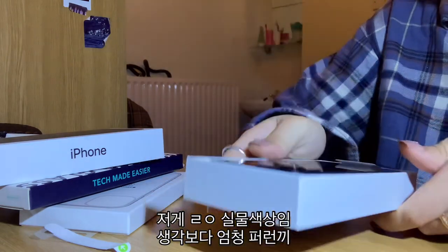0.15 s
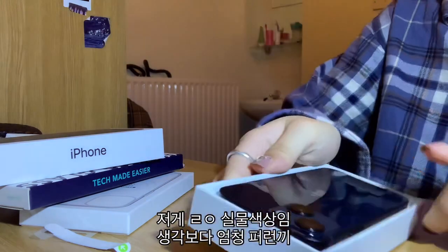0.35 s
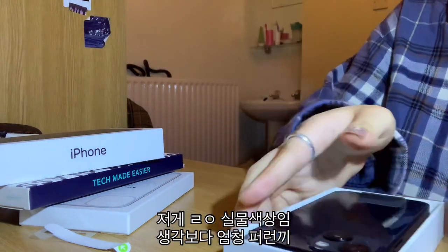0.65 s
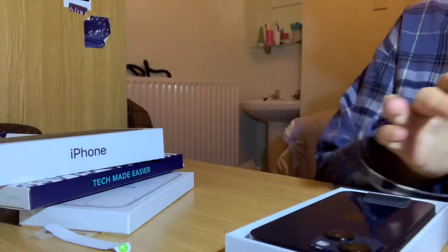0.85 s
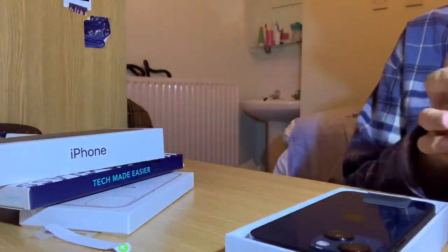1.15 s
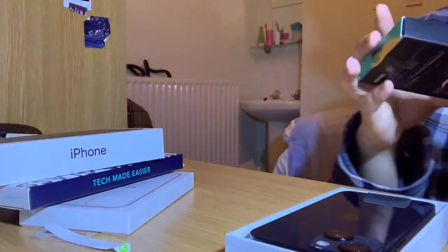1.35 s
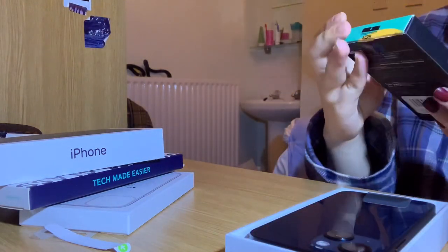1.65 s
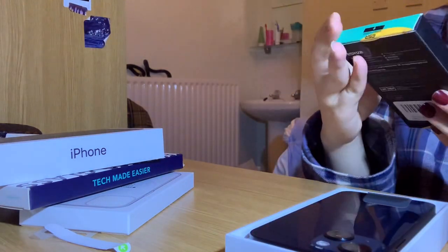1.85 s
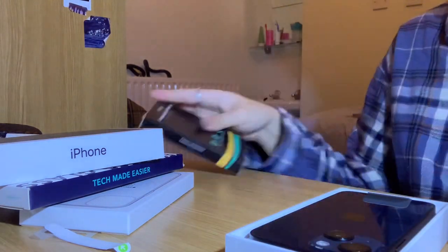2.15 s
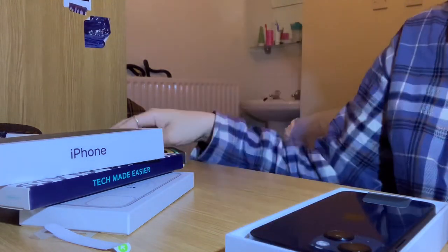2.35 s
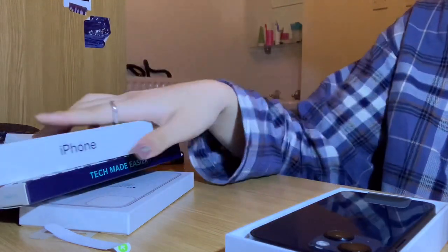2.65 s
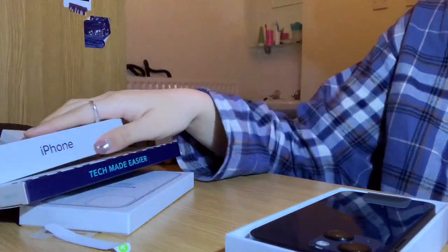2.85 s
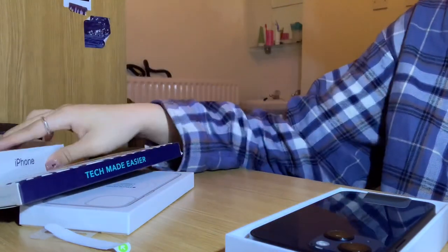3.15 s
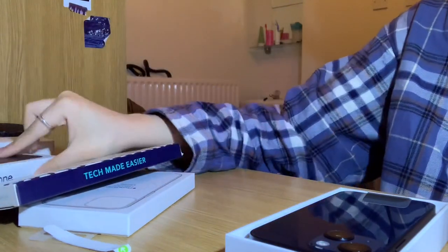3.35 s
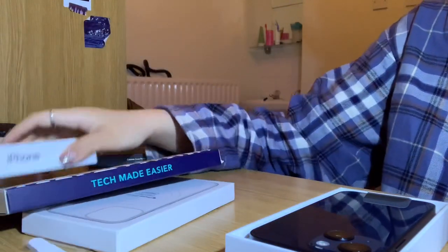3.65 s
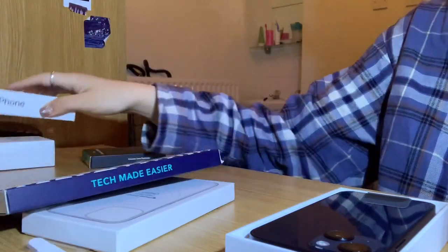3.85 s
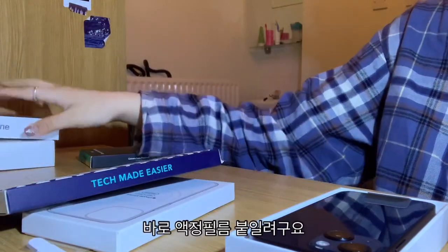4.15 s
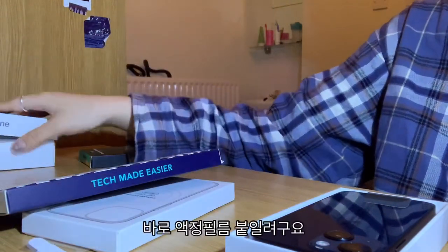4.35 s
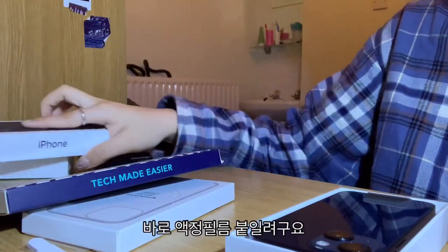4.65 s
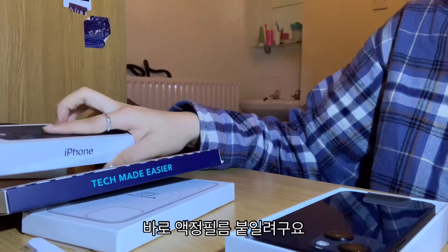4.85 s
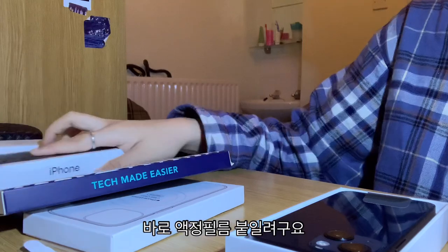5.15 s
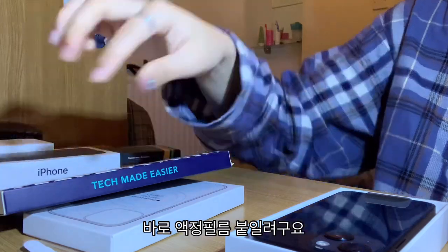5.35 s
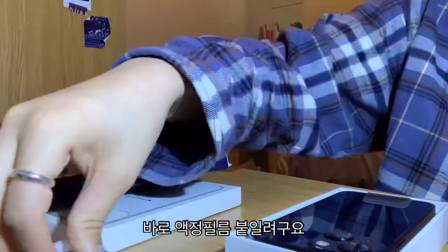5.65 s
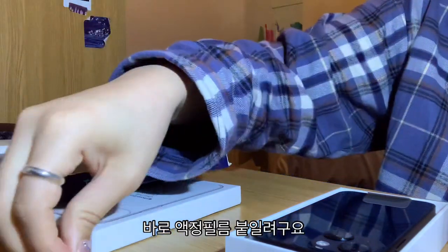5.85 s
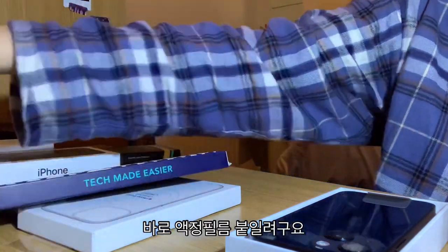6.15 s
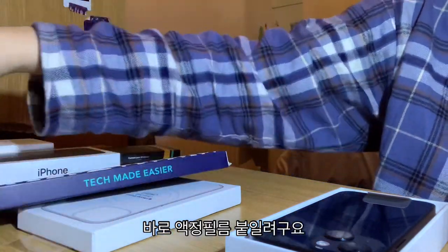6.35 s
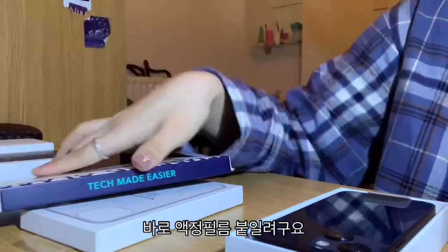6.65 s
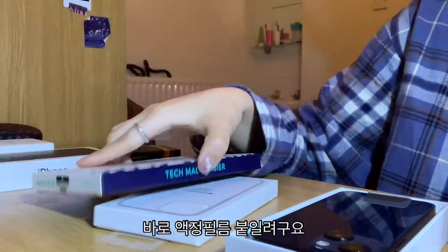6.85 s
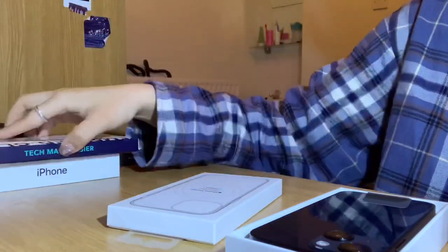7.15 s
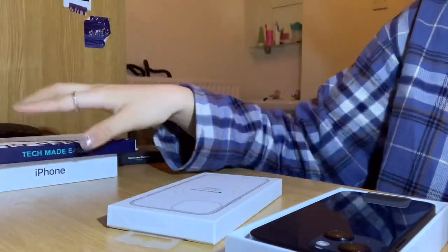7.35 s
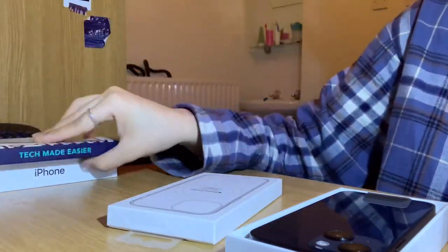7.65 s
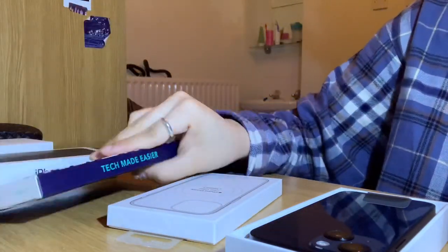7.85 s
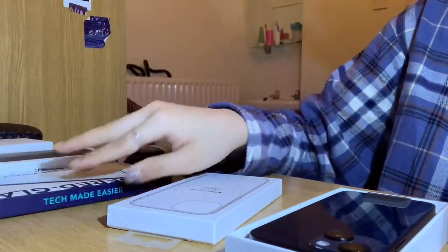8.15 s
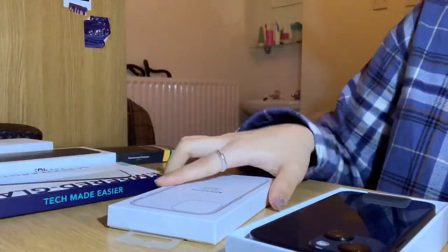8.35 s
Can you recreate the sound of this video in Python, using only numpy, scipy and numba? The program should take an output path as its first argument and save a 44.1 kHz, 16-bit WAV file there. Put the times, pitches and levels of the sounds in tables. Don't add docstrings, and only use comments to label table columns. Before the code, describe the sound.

Close stereo phone pickup of hands moving cardboard boxes: one low loud thump at the start, soft nail patter and film rustle, then clattering box walls, a rattling inner tray and dry scraping as the stack is rearranged. Two bright knocks follow at five seconds, a lull with small clicks, and final drops and taps. Faint hum and distant traffic rumble, short dry room.

```python
import sys
import numpy as np
from scipy import signal
from scipy.fft import rfft, irfft, next_fast_len
from scipy.io import wavfile
from scipy.ndimage import uniform_filter1d, map_coordinates
from numba import njit

SR = 44100
rng = np.random.default_rng(int(sys.argv[2]) if len(sys.argv) > 2 else 0)


def wav_out(sig):
    wavfile.write(sys.argv[1], SR, np.round(np.clip(np.atleast_2d(sig).T, -1, 1) * 32767).astype(np.int16))


def ratio_of_db(decibels):
    return 10 ** (np.asarray(decibels, float) / 20)


N = 375291
FAST = next_fast_len(N)
CLOCK = np.arange(N) / SR
SOFT_TICK_HZ = 2900
LIGHT_THUMP_DB, LIGHT_T60_S = -35.5, 0.011


def level(x, db):
    return x * ratio_of_db(db) / np.sqrt(np.mean(x ** 2))


def on_log_axis(hz, value):
    return np.interp(np.log(np.fft.rfftfreq(FAST, 1 / SR) + 1), np.log(hz), value)


def ring(x, hz, width):
    return signal.lfilter(*signal.iirpeak(hz, hz / width, SR), x)


def walk(rate):
    hold = int(SR / rate)
    steps = np.repeat(rng.standard_normal(N // 500), hold)[:N]
    return 1.3 * uniform_filter1d(uniform_filter1d(steps, hold), hold)


def pair(x, alike):
    alike = np.clip(alike, 0, 1)
    middle = np.sqrt(1 + alike) * x[0]
    side = np.sqrt(1 - alike) * x[1] * np.array([[1], [-1]])
    return (middle + side) / np.sqrt(2)


def both(x):
    return np.outer([1, 1], x)


def add(out, s, sound):
    i = int(s * SR)
    out[:, i:i + sound.shape[1]] += sound[:, :N - i]


def extend(rows, *same):
    return [(*row, *same) for row in rows]


def strokes(rows):
    grip_s, let_go_s, silence_db = 0.0098, 0.16, -110
    t, power = CLOCK[::32], 0
    for s, length, first_db, last_db, *_ in rows:
        corners = [s - grip_s, s, s + length, s + length + let_go_s]
        power = power + ratio_of_db(2 * np.interp(t, corners, [silence_db, first_db, last_db, silence_db]))
    return np.repeat(power, 32)[:N]


def patchy(x):
    patch_db, patch_s, patch_hz = 3.0, .022, 1200
    hz, t, cells = signal.stft(x, SR, nperseg=512)
    field = rng.standard_normal((128, 1024))
    place = np.meshgrid(hz / patch_hz, t / patch_s, indexing="ij")
    db = patch_db * map_coordinates(field, place, mode="mirror") * (hz[:, None] > 1500)
    return signal.istft(cells * ratio_of_db(db), SR, nperseg=512)[1][:, :N]


# (centre [Hz], width [Hz], level [dB])
RUB_BANDS = [
    [(550, 1300, 5), (790, 620, -4), (980, 310, 4.5)],
    [(1420, 5700, 11.5), (2500, 820, 14.5)],
    [(4220, 17000, 20.5), (5970, 4900, 10.5)],
    [(10500, 21000, 12), (14040, 2400, 16.5)],
]
# (start [s], length [s], first level [dB], last level [dB], hollow pitch [Hz])
DRAGS = [(0, 0.45, -66.5, -58, 660), (0.452, 0.082, -49, -47.5, 690), (0.666, 0.15, -43, -70, 600),
         (0.991, 0.89, -61.5, -68, 900), (1.883, 0.13, -75, -48, 1050), (2.192, .08, -41, -48, 1030),
         (2.658, 0.33, -61, -37, 650), (3.068, 0.37, -46, -60, 900), (3.307, 0.059, -38, -56, 887),
         (3.377, 0.13, -55, -39, 775), (3.604, 0.044, -36.5, -63, 680), (3.931, 0.16, -48.5, -63.5, 790),
         (4.399, 0.29, -45, -61, 918), (4.799, .07, -39.5, -77, 860), (5.086, 0.18, -45, -38.5, 750),
         (5.516, 0.16, -67.5, -38.5, 700), (6.204, 0.06, -61, -80, 670), (6.635, 0.17, -76, -46, 640),
         (6.869, .17, -62.5, -63, 630), (7.073, 0.058, -55, -43, 620), (7.406, 0.37, -56, -58.5, 600),
         (7.786, 0.353, -63, -55, 600), (8.299, .17, -63.5, -71, 600)]
# (start [s], length [s], first level [dB], last level [dB])
SCRAPES = [(0.111, 0.19, -55, -59), (0.34, 0.62, -54, -64.5), (1.03, 0.57, -65.5, -62),
           (1.858, 0.42, -59, -73), (2.167, 0.84, -48.5, -80.5), (2.91, 0.14, -40, -49.5),
           (3.042, 0.27, -37.5, -53.5), (3.48, 0.11, -41, -54.5), (4.347, 0.21, -56.5, -40),
           (4.592, 0.075, -47.5, -46.5), (5.057, .17, -50, -64.5), (5.529, 0.22, -42, -74),
           (7.397, 0.26, -49, -69), (7.79, 0.07, -44.5, -46.5), (8.357, 0.065, -53, -47)]
# (start [s], length [s], first level [dB], last level [dB])
BRUSHES = [(0.658, 0.29, -49.5, -62), (1.95, 0.06, -78, -50), (2.209, .14, -54, -39.5),
           (2.634, 0.45, -49.5, -38.5), (3.287, 0.19, -58, -39), (3.588, 0.053, -40.5, -54),
           (3.903, 0.07, -43, -46), (4.05, 0.058, -61, -49.5), (4.396, 0.1, -41, -40),
           (4.802, 0.06, -47, -61), (4.888, 0.14, -52.5, -55.5), (5.186, 0.051, -44, -47),
           (5.653, 0.1, -45, -48.5), (5.772, 0.13, -67, -53), (6.638, 0.19, -57, -42.5),
           (6.858, 0.14, -65, -49), (7.075, 0.099, -46, -51), (7.548, 0.16, -42, -49.5),
           (7.921, 0.2, -49, -48.5)]
# (start [s], length [s], first level [dB], last level [dB])
RUSTLES = [(0, 0.1, -57.5, -69), (0.122, 0.16, -56, -54.5), (0.422, 0.077, -73, -53),
           (0.776, 0.13, -55, -57.5), (1.017, 0.063, -59.5, -66), (1.12, 0.12, -62.5, -52.5),
           (1.265, 0.16, -49, -69), (1.485, 0.049, -77, -58.5), (1.626, 0.04, -54, -73),
           (1.851, 0.24, -56, -77), (2.656, 0.64, -47, -57.5), (3.309, 0.16, -52, -49.5),
           (4.453, 0.16, -49, -49), (4.6, 0.095, -57, -45.5), (4.915, 0.065, -51, -60),
           (5.071, 0.14, -50, -53), (5.723, 0.21, -68, -59.5), (6.126, 0.12, -76, -56.5),
           (6.326, 0.14, -40.5, -68.5), (6.706, 0.13, -46.5, -49.5), (7.106, 0.032, -45.5, -48),
           (7.396, 0.18, -55.5, -48), (7.646, 0.061, -56, -41.5), (7.795, 0.067, -65, -50),
           (7.929, 0.12, -49, -39.5), (8.061, 0.13, -36, -72)]


def slides():
    mix_db = [(1.5, -34.5, -31, -59.5),
              (-15.5, -5, -16, -14.5),
              (-13, -11.5, -9, -18),
              (-38.5, -27, -14, -3)]
    motions = np.array([strokes(rows) for rows in (DRAGS, SCRAPES, BRUSHES, RUSTLES)])
    surfaces = np.sqrt(ratio_of_db(2 * np.transpose(mix_db)) @ motions)
    start, length, *_, hollow_hz = np.transpose(DRAGS)
    drone_hz = np.interp(CLOCK, start + length / 2, hollow_hz)
    out, grip = 0, walk(35)
    snags = 1 + ratio_of_db(14) * (rng.random(N) < 500 / SR) * rng.random(N)
    for k, (surface, bands) in enumerate(zip(surfaces, RUB_BANDS)):
        hollow = k == 0
        grit = rng.standard_normal((2, N)) * ratio_of_db(3.5 * np.minimum(rng.exponential(size=N), 3)) * snags
        rub = 0
        for hz, width, db in bands:
            wide = ring(ring(grit, hz, width), hz, width)
            narrow = ring(wide, 0.938 * hz, width / 9) + ring(wide, 1.105 * hz, width / 7)
            off_db = -70 * np.log2(hz / drone_hz) ** 2 * hollow
            sway = ratio_of_db(db + off_db + 1.4 * walk(25))
            rub = rub + sway * (wide + ratio_of_db(1 + 2.5 * walk(12)) * narrow)
        out = out + pair(level(rub, 0), 0.31) * surface * ratio_of_db((1.2 if hollow else 2.8) * grip)
    return patchy(out)


# (frequency [Hz], density [dB per Hz])
AIR = [(30, -31.5), (50, -16.5), (80, -21), (120, -7.5), (200, -12.5), (330, -12), (450, -18), (800, -27.5),
       (1500, -30), (2200, -46), (8000, -69.5), (11000, -49.5), (16000, -60.5)]
# (centre [Hz], width [Hz], level [dB])
HUM = [
    (164.4, 2.7, -60.5),
    (264.6, 11, -60),
    (329.2, 35, -65),
    (639.7, 6.7, -64.5),
]
# (frequency [Hz], level [dB])
WHINE = [
    (635.2, -67),
]
# (time [s], level [dB])
RUMBLE = [
    (0.0, -60.5),
    (3.36, -68),
    (3.6, -64),
    (8.51, -56.5),
]


def room_tone():
    noise = rfft(rng.standard_normal((2, FAST))) * ratio_of_db(on_log_axis(*np.transpose(AIR)))
    alike = on_log_axis([150, 300, 700, 2000], [0.98, 0.94, 0.15, .05])
    air = level(irfft(pair(noise, alike), FAST)[:, :N], -54.5)
    hum = 0
    for hz, width, db in HUM:
        band = ring(rng.standard_normal((2, N)), hz, width)
        hum = hum + pair(level(band, db), 1.3 - hz / 600)
    traffic = level(ring(ring(rng.standard_normal(N), 89, 35), 89, 35), 0)
    traffic = traffic * ratio_of_db(np.interp(CLOCK, *np.transpose(RUMBLE)))
    whine = sum(ratio_of_db(db + 3.0 + 0.73 * walk(2.5)) * np.sin(2 * np.pi * hz * CLOCK) for hz, db in WHINE)
    drift = ratio_of_db(1.5 * walk(3.13))
    return whine + traffic + air * drift + hum


def modes(hz, db, t60, t, push_cycles):
    rise = 1 - np.exp(-np.outer(hz, t) / push_cycles)
    swing = np.exp(np.outer(2j * np.pi * hz - np.log(1000) / t60, t)).imag
    y = ratio_of_db(db) @ (rise * swing)
    return y / np.abs(y).max()


# (ratio to ring, level [dB], share of the ring time)
WALL_MODES = [
    (0.549, -9.5, 1.8),
    (0.752, -5.5, 0.55),
    (1, -0.5, 1.21),
    (1.298, -4.5, 0.77),
    (1.7, -10, 0.64),
    (2.201, -6.5, 0.32),
    (2.9, -15, 0.55),
    (3.8, -15, 0.57),
]
# (frequency [Hz], level [dB], t60 [s])
TABLE_MODES = [
    (117, 6.5, 0.13),
    (157.3, 6, 0.19),
    (260.6, 3.5, 0.21),
]


def knocks(rows, slap_db=-5.0):
    contact_s = 0.00089
    gripped_s, gripped_db = 0.0044, -6
    soft_card_hz, soft_card_db = 2000, -12.5
    out, t = np.zeros((2, N)), np.arange(5000) / SR
    ratio, wall_db, share = np.transpose(WALL_MODES)
    table_hz, table_db, table_t60 = np.transpose(TABLE_MODES)
    for s, db, hz, thump_db, t60 in rows:
        detune, strength, thump = rng.standard_normal((3, len(WALL_MODES)))
        mode_hz = hz * ratio * (1 + 0.1 * detune * (ratio != 1))
        soft_db = soft_card_db * np.log2(np.maximum(mode_hz / soft_card_hz, 1))
        box = modes(mode_hz, wall_db + soft_db + strength, t60 * share, t, 0.77)
        box = box * (ratio_of_db(gripped_db) + np.exp(-(t / gripped_s) ** 2))
        loose = ring(ring(rng.standard_normal(len(t)), hz, 0.5 * hz), 0.92 * hz, 2.0 * hz)
        loose = signal.lfilter(*signal.butter(2, soft_card_hz, fs=SR), loose)
        chatter = loose * np.exp(-t / (.33 * t60)) * (1 - np.exp(-t / .002))
        chatter = chatter / np.abs(chatter).max()
        table = modes(table_hz * (1 + 0.06 * detune[:3]), table_db + 6.3 * thump[:3], table_t60, t, 0.54)
        slap = ring(ring(rng.standard_normal(len(t)), 2300, 1500), 2300, 1500) * np.exp(-t / 0.0015)
        slap = ratio_of_db(slap_db) * (400 / hz) ** 2 * slap / np.abs(slap).max()
        push = ring(np.exp(-t * hz * 0.91) * np.sin(2 * np.pi * hz * t), hz, 2 * hz)
        hit = box + slap + ratio_of_db(-15.5) * push + ratio_of_db(-5.5) * chatter + ratio_of_db(thump_db + 2.0) * table
        give = 1 - np.exp(-(t / contact_s) ** 2)
        add(out, s, both(hit * give * ratio_of_db(db - 1.5)))
    return signal.lfilter(*signal.butter(2, 95, "high", fs=SR), out)


# (time [s], peak level [dB], box ring [Hz])
PATTER = [(.007, -38, 1070), (.022, -47.5, 2440), (.067, -47, 1490), (.186, -36.5, 1100), (.266, -42, 990),
          (1.022, -48, 1020), (1.453, -54, 1370), (1.489, -59, 1360), (1.544, -45, 1180),
          (1.628, -47, 1440), (1.938, -46, 1130), (1.947, -46, 1410), (2.108, -41.5, 1000),
          (2.757, -37, 2200), (2.877, -41, 2500), (3.098, -41, 1500), (3.118, -29, 1250),
          (4.064, -45, 1160), (4.102, -46, 2500), (4.97, -53, 2000), (5.642, -42, 1240), (5.674, -41, 1280),
          (6.21, -40.5, 1010), (6.266, -52, 3020), (6.914, -49, 1790), (6.936, -40, 1150), (7.56, -23, 900),
          (7.74, -36, 690), (8.003, -41, 1040), (8.31, -52, 2400)]


def nail_patter():
    return knocks(extend(PATTER, LIGHT_THUMP_DB, LIGHT_T60_S), slap_db=-18)


# (time [s], peak level [dB], box ring [Hz])
NUDGES = [(0.121, -37, 393), (0.364, -28, 496), (.458, -37.5, 360), (0.874, -39, 530), (2.192, -41, 950),
          (2.629, -36.5, 523), (2.735, -30.5, 644), (3.586, -27, 743), (3.943, -25.5, 545),
          (4.361, -35, 348), (4.403, -29.5, 610), (.747, -32.5, 1304), (4.8, -33.5, 372),
          (5.191, -33.5, 950), (6.642, -39, 925), (7.402, -27.5, 487), (7.548, -27.5, 713),
          (7.71, -33, 592), (7.947, -31.5, 870), (8.064, -37.5, 620)]


def nudges():
    return knocks(extend(NUDGES, -8, 0.092))


def ticks(rows):
    out, t = np.zeros((2, N)), np.arange(2000) / SR
    fade = ratio_of_db(-2) * np.exp(-t / 0.0011) + np.exp(-t / 0.0048) + ratio_of_db(-29.5) * np.exp(-t / 0.0095)
    for s, db, hz in rows:
        grit = rng.standard_normal((2, len(t))) * fade
        edge = ring(grit, hz, 0.49 * hz)
        edge = edge + ratio_of_db(-12.5) * ring(grit, 6000, 6400) + ratio_of_db(-34.5) * ring(grit, 12000, 7000)
        edge = pair(edge, .93)
        add(out, s, ratio_of_db(db) * edge / np.abs(edge).max())
    return out


# (time [s], peak level [dB])
EDGES = [(.1328, -38.5), (.3693, -26), (0.6477, -18.5), (.7326, -37), (.7859, -34.5), (1.969, -41),
         (2.1685, -35), (2.2864, -20.5), (2.3206, -25), (2.6554, -29), (2.759, -41.5), (3.0171, -9),
         (3.247, -56), (3.476, -39), (3.907, -32.5), (4.43, -25.5), (5.0609, -44), (5.075, -31.5),
         (5.212, -25.5), (5.5343, -28), (6.6428, -43), (7.092, -23), (7.791, -34.5), (7.8276, -28),
         (8.345, -32), (8.3877, -26)]


def card_edges():
    return ticks(extend(EDGES, SOFT_TICK_HZ))


def rubs(rows, width):
    out, size = np.zeros((2, N)), 8000
    for s, length, db, hz in rows:
        grit = rng.standard_normal((2, size)) * ratio_of_db(3 * rng.exponential(size=size))
        swell = np.sin(np.pi * np.clip(np.arange(size) / SR / length, 0, 1) ** 0.7)
        band = ring(ring(grit * swell, hz, width * hz), hz, width * hz)
        add(out, s, pair(level(band, db) * np.sqrt(length * SR / size), 0.5))
    return out


# (start [s], length [s], level [dB], pitch [Hz])
SWISHES = [(0.181, 0.18, -67.5, 5200), (0.371, 0.041, -40, 1660), (0.784, 0.031, -56, 4430),
           (0.877, 0.045, -58, 3180), (3.022, 0.024, -30, 2515), (3.294, 0.033, -66, 2000),
           (3.357, 0.21, -43, 750), (3.483, 0.055, -48, 1820), (4.447, 0.044, -40.5, 1440),
           (4.533, 0.083, -54.5, 2850), (4.536, 0.071, -55, 1160), (4.901, 0.093, -56, 5060),
           (5.093, 0.028, -41.5, 2000), (5.217, 0.05, -47.5, 1773), (7.926, 0.047, -46.5, 923),
           (0.505, 0.065, -40, 347), (0.503, 0.099, -44, 800), (3.302, 0.13, -49, 865),
           (3.428, 0.089, -37, 600), (4.799, 0.045, -42, 284), (1.203, 0.012, -36, 1150),
           (7.935, 0.034, -53, 2700), (0.651, 0.034, -40, 2150)]


def flap_swishes():
    return rubs(SWISHES, .3)


# (time [s], peak level [dB], box ring [Hz], table thump [dB], ring t60 [s])
BLOWS = [(.371, -14, 406, -6, 0.03), (.648, -1.5, 390, -12.5, 0.036), (.735, -27.5, 1225, -1.5, 0.035),
         (1.204, -23.5, 1264, -32.5, 0.0037), (2.287, -23.5, 1000, -14, 0.044),
         (2.321, -23, 648, -7.5, 0.041), (2.809, -23, 576, -11.5, 0.1), (2.954, -17.5, 429, -10, 0.078),
         (3.018, -7, 903, -18.5, 0.069), (3.136, -17.5, 1008, -19, 0.056), (3.248, -16, 1093, -20, 0.06),
         (3.295, -24.5, 840, -24, 0.026), (3.477, -9.5, 658, -21.5, 0.033), (3.906, -14, 911, -31.5, 0.047),
         (4.44, -19, 654, -13.5, 0.082), (5.075, -9, 1010, -32.5, 0.032), (5.214, -6.5, 942, -33.5, 0.028),
         (5.219, -13, 542, -21.5, 0.073), (5.537, -21.5, 430, -25, 0.062), (7.092, -20, 520, -12, 0.043),
         (7.117, -20, 644, -21.5, 0.051), (7.624, -20, 637, -41, .035), (7.796, -29.5, 432, -23, 0.14),
         (8.075, -21, 513, -6, 0.068)]


def boxes_set_down():
    return knocks(BLOWS)


# (time [s], peak level [dB], box ring [Hz], table thump [dB], ring t60 [s])
BOUNCES = [(.384, -31.5, 320, 2.5, 0.082), (.641, -22.5, 496, -20, 0.023), (.659, -17.5, 295, -2.5, 0.14),
           (3.253, -13, 525, -17, 0.11), (3.309, -25.5, 945, -19.5, 0.044),
           (3.485, -20.5, 574, -12.5, 0.045), (4.439, -21, 1100, -19, 0.025),
           (4.455, -27, 1364, -22.5, 0.036), (5.063, -29, 670, -23, .04), (5.083, -19.5, 607, -30, .03),
           (5.099, -27, 600, -18, .04), (5.127, -30.5, 587, -24, 0.022), (5.231, -28, 1035, -8, 0.022),
           (7.409, -28, 550, -10, .03), (7.799, -19, 468, -24, 0.033), (8.09, -31.5, 400, -15.5, 0.064)]


def bounces():
    return knocks(BOUNCES, slap_db=-18)


# (time [s], peak level [dB], box ring [Hz])
TAPS = [(2.172, -36, 1200), (.562, -37, 373), (0.823, -35, 1090), (0.893, -34, 1160), (1.865, -42.5, 2310),
        (1.967, -34, 980), (2.011, -32, 486), (2.14, -34.5, 970), (2.657, -24, 850), (2.696, -26, 482),
        (2.913, -28, 680), (2.079, -42.5, 980), (6.711, -44, 1510), (6.772, -46, 507), (6.969, -40, 703),
        (7.064, -30.5, 880), (7.452, -39, 350), (7.477, -34, 955), (7.597, -33, 473), (7.825, -22.5, 546),
        (8.343, -29.5, 704), (8.359, -25, 694), (8.385, -30.5, 726)]


def finger_taps():
    return knocks(extend(TAPS, -31.5, 0.044))


# (start [s], length [s], level [dB], pitch [Hz])
RASPS = [
    (2.17, 0.085, -55, 2700),
    (6.706, 0.043, -45.5, 2900),
    (.876, 0.032, -48, 5600),
    (.744, 0.011, -49, 5800),
    (8.385, 0.028, -45, 3800),
]


def fibre_rasps():
    return rubs(RASPS, 1.26)


# (time [s], peak level [dB], ring [Hz])
NAILS = [(.822, -23, 10500), (.8755, -27.5, 4900), (1.202, -31.5, 9200), (2.007, -36.5, 5270),
         (2.81, -20, 4470), (2.946, -18.5, 2200), (3.091, -24, 10000), (3.166, -41.5, 12600),
         (3.5865, -26.5, 6060), (4.799, -38.5, 4690), (5.677, -27.5, 13260), (5.6926, -22, 15200),
         (5.702, -22, 3700), (5.8725, -38, 12600), (6.21, -33, 10030), (6.3273, -20.5, 10500),
         (6.7092, -38, 4730), (7.0606, -34, 5870), (7.127, -33.5, 11100), (7.3986, -38.5, 5130),
         (7.5485, -35, 4800), (7.624, -22.5, 5500), (7.95, -36.5, 9600)]


def nail_clicks():
    return ticks(NAILS)


def rattles(rows, t60):
    out, t = np.zeros((2, N)), np.arange(1500) / SR
    for s, db, ring_hz in rows:
        hz = ring_hz * np.array([.93, 1.08]) * (1 + 0.049 * rng.standard_normal(2))
        add(out, s, both(ratio_of_db(db) * modes(hz, np.zeros(2), np.full(2, t60), t, 3.3)))
    return out


# (time [s], peak level [dB], pitch [Hz])
POCKS = [
    (1.2035, -31.5, 1152),
    (2.0065, -32.5, 1140),
    (3.295, -16.5, 814),
    (7.793, -26.5, 517),
    (8.074, -17.5, 530),
]


def lid_pocks():
    return rattles(POCKS, 0.034)


# (start [s], length [s], peak level [dB], pitch [Hz])
LEANS = [
    (1.7, 0.23, -50.5, 131.4),
    (2.203, 0.083, -39, 106),
    (2.958, 0.33, -44.5, 62.1),
    (5.279, 0.14, -50.5, 50.3),
    (5.73, 0.11, -46, 49.8),
]


def table_leans():
    out = np.zeros((2, N))
    for s, length, db, hz in LEANS:
        t = np.arange(int(length * SR)) / SR
        add(out, s, both(ratio_of_db(db) * np.hanning(len(t)) * np.sin(2 * np.pi * hz * t)))
    return out


# (time [s], peak level [dB], box ring [Hz])
CORNERS = [(1.865, -45, 2340), (1.967, -35, 1065), (2.008, -33, 1050), (2.657, -29, 2170),
           (3.018, -11.5, 555), (3.2965, -17, 805), (3.907, -20.5, 1200), (5.075, -7, 890),
           (5.2195, -10, 617), (5.541, -38, 424), (8.0755, -16, 553), (8.344, -32, 900)]


def corners():
    return knocks(extend(CORNERS, LIGHT_THUMP_DB, 0.01))


# (time [s], peak level [dB])
CRACKLE = [(2.6974, -39), (2.7337, -45), (2.7797, -53), (2.8398, -36), (2.8751, -44), (2.914, -44),
           (2.9853, -44), (3.0591, -31), (3.0899, -43), (3.1357, -30), (3.1898, -37), (3.6102, -38),
           (4.4393, -22.5), (7.4078, -34), (7.4778, -42), (7.5947, -39), (7.7099, -39), (8.0022, -42),
           (8.074, -35), (8.3562, -38)]


def crease_crackle():
    return ticks(extend(CRACKLE, SOFT_TICK_HZ))


# (time [s], peak level [dB])
RATTLES = [(2.733, -41), (2.809, -23.5), (3.0173, -16), (7.409, -36.5), (7.445, -43), (7.454, -38),
           (7.483, -39), (7.503, -49), (7.521, -47), (7.548, -33.5), (7.558, -41), (7.576, -39),
           (7.596, -44), (7.6247, -26), (7.712, -40), (7.724, -39), (7.792, -33)]


def tray_rattles():
    return rattles(extend(RATTLES, 2420), 0.018)


# (time [s], peak level [dB], box ring [Hz])
FUMBLE = [
    (6.65, -40, 1050),
    (6.709, -36, 875),
    (6.78, -33, 750),
    (6.855, -44, 619),
    (6.915, -51, 622),
    (6.936, -36.5, 869),
    (6.968, -41, 660),
    (7.062, -34, 860),
]


def fumble():
    return knocks(extend(FUMBLE, LIGHT_THUMP_DB, LIGHT_T60_S))


@njit
def walls(x, lags, gain, damp):
    line, soft, out = np.zeros((8, 4096)), np.zeros(8), np.zeros((2, len(x)))
    for i in range(len(x)):
        total = 0.
        for k in range(8):
            soft[k] += (1 - damp) * (gain[k] * line[k, (i - lags[k]) & 4095] - soft[k])
            total += soft[k]
            out[k % 2, i] += soft[k]
        for k in range(8):
            line[k, i & 4095] = x[i] + soft[k] - total / 4
    return out


def room_echo(hands, lags):
    t60_s, damp, echo_db = .25, .72, -17
    return ratio_of_db(echo_db) * walls(hands.mean(axis=0), lags, ratio_of_db(-60 * lags / SR / t60_s), damp)


# (time [s], left minus right level [dB])
HANDS = [
    (0.0, -3.5),
    (3.981, 2),
    (8.51, 0),
]
# (frequency [Hz], left lead [rad], left minus right level [dB])
PORTS = [(150, 0, -.7), (400, .6, .5), (700, 1.1, -1.5), (1300, 1.7, -4.5), (2500, -1.8, 4.5),
         (4400, .2, 2.0), (8000, 2.3, 1.5), (16000, -1.5, .8)]


def at_ports(hands):
    sides = np.array([[.5], [-.5]])
    bass = signal.lfilter(*signal.butter(1, 300, fs=SR), hands)
    hands = bass + (hands - bass) * ratio_of_db(np.interp(CLOCK, *np.transpose(HANDS)) * sides)
    hz, lead, db = np.transpose(PORTS)
    body = np.exp(1j * on_log_axis(hz, lead) * sides) * ratio_of_db(on_log_axis(hz, db) * sides)
    return irfft(rfft(hands, FAST) * body, FAST)[:, :N]


def scene():
    hands = boxes_set_down() + finger_taps() + nudges()
    hands = hands + nail_clicks() + card_edges() + slides()
    wall_lags = rng.integers(300, 2200, 8)
    room = room_tone()
    hands = hands + bounces() + nail_patter() + flap_swishes() + table_leans()
    hands = hands + crease_crackle() + fumble() + corners() + tray_rattles()
    hands = hands + fibre_rasps() + lid_pocks()
    return at_ports(hands) + room_echo(hands, wall_lags) + room


def top_cut(x):
    return signal.sosfilt(signal.butter(12, 16520, fs=SR, output="sos"), x)


def record(dry):
    x = signal.sosfilt(signal.butter(3, 70, "high", fs=SR, output="sos"), dry)
    x = x - 0.18 * ring(x, 7540, 3400)
    x = signal.sosfilt(signal.butter(10, 15200, fs=SR, output="sos"), x)
    return top_cut(x)


dry = scene()
out = record(dry)
wav_out(out)
```